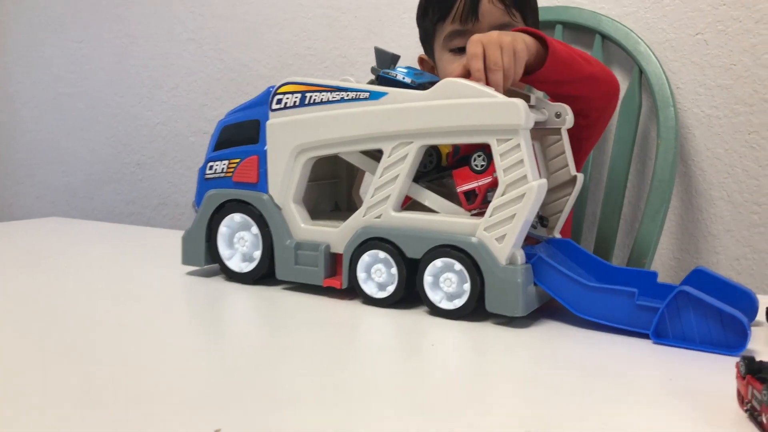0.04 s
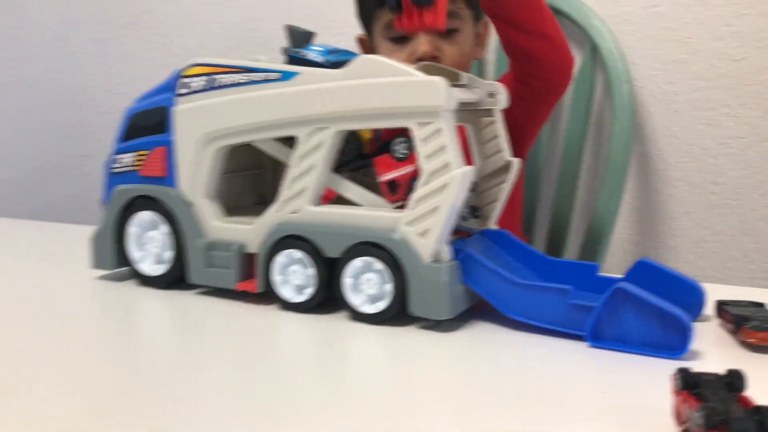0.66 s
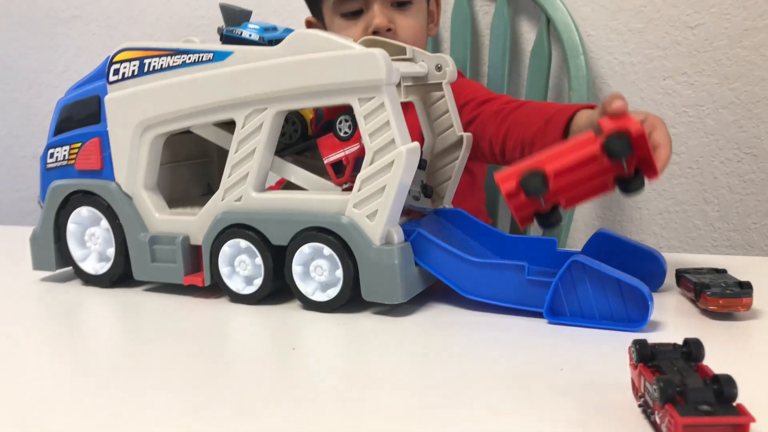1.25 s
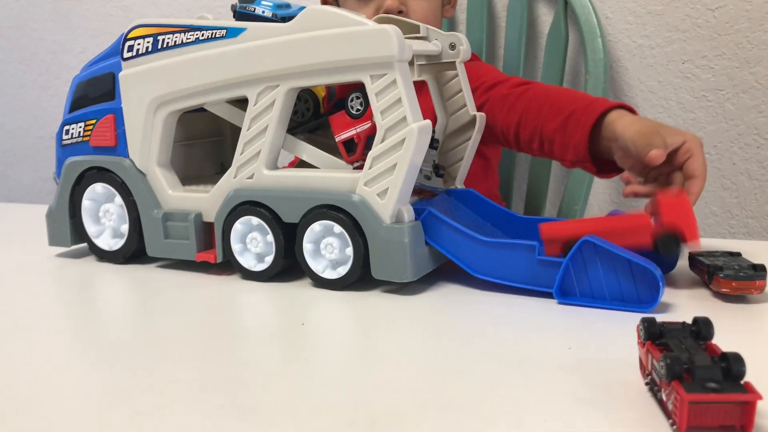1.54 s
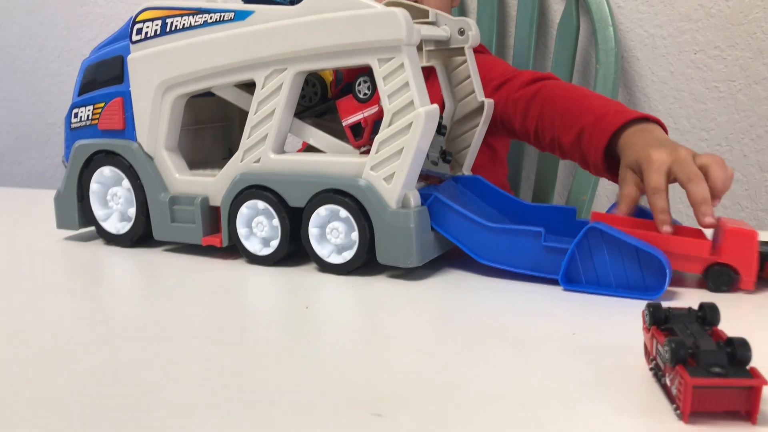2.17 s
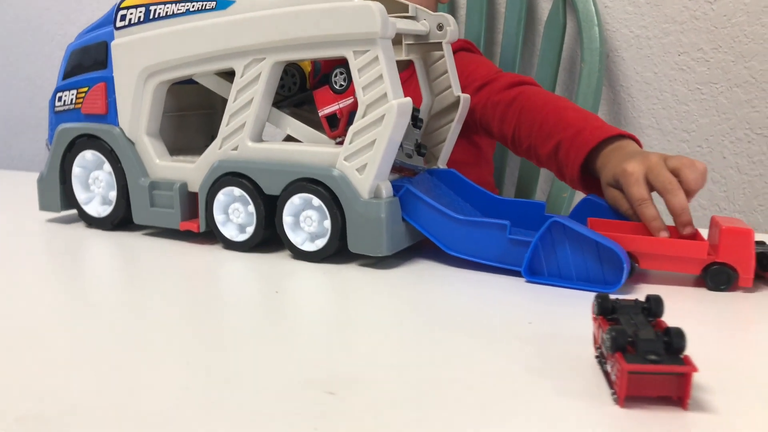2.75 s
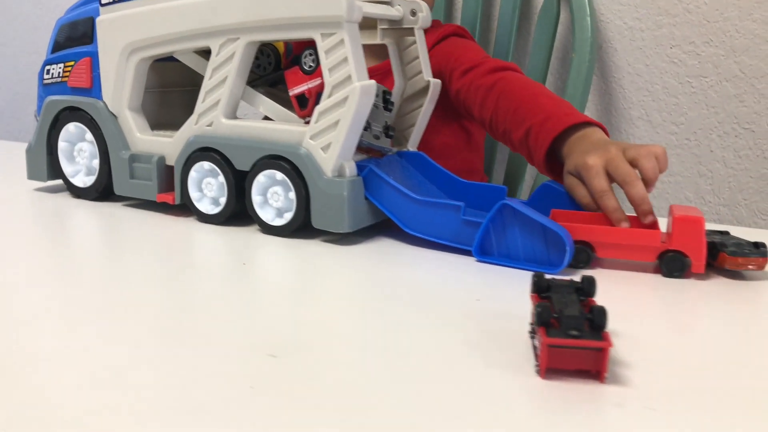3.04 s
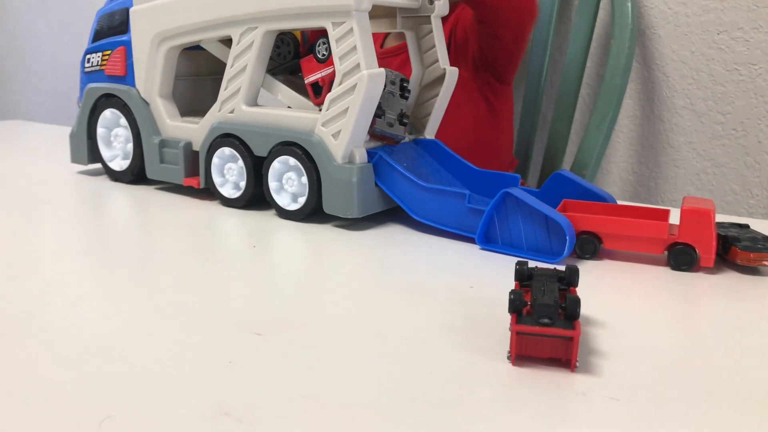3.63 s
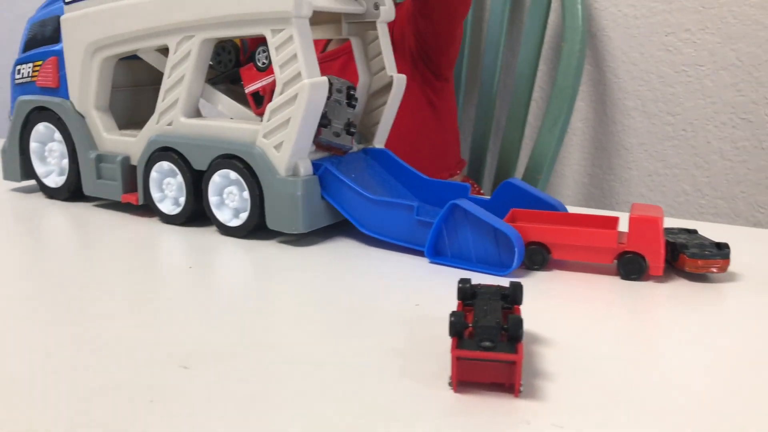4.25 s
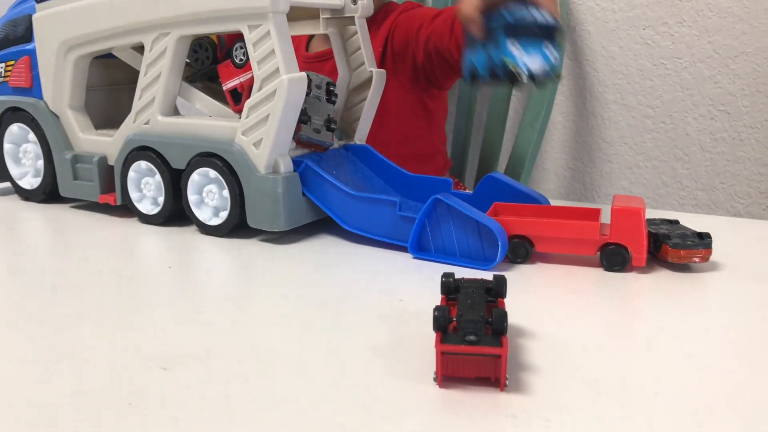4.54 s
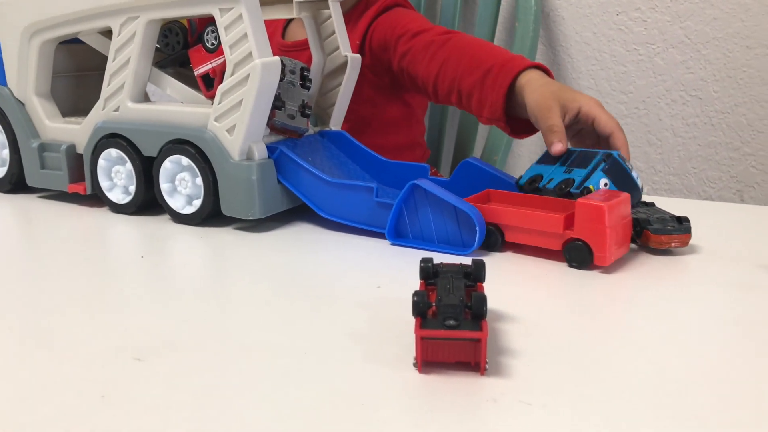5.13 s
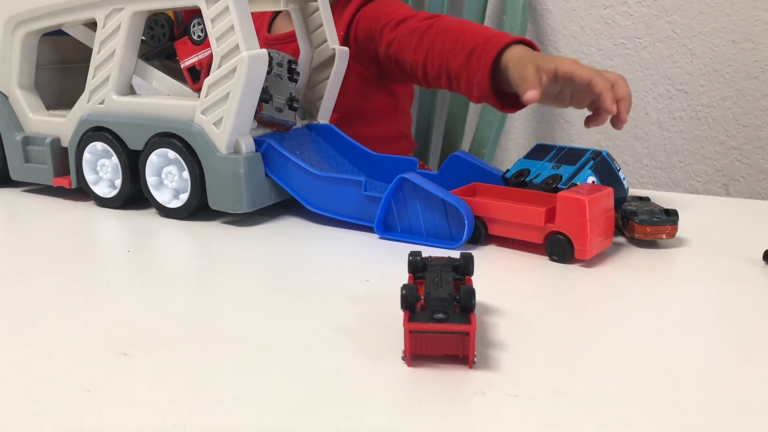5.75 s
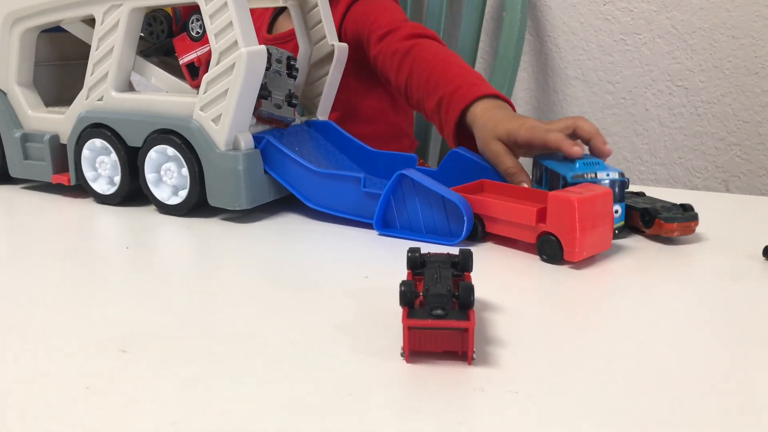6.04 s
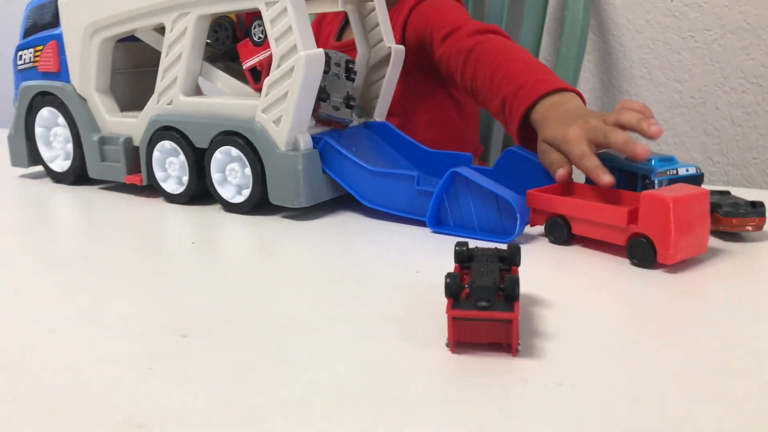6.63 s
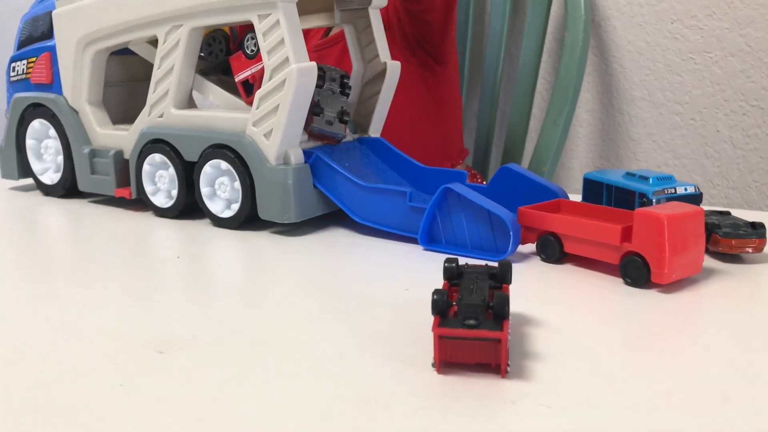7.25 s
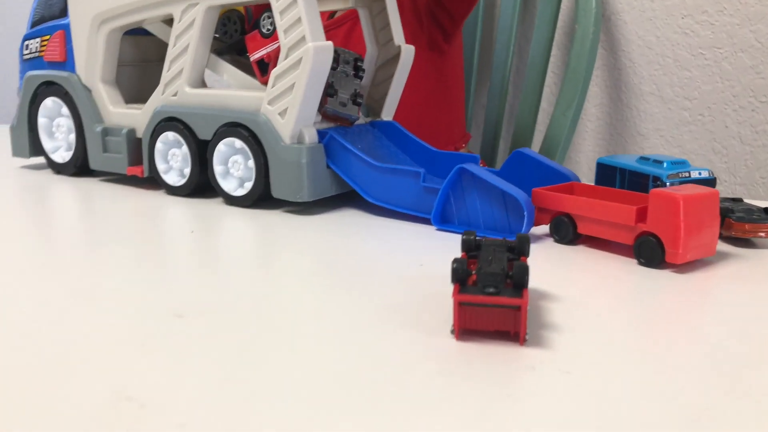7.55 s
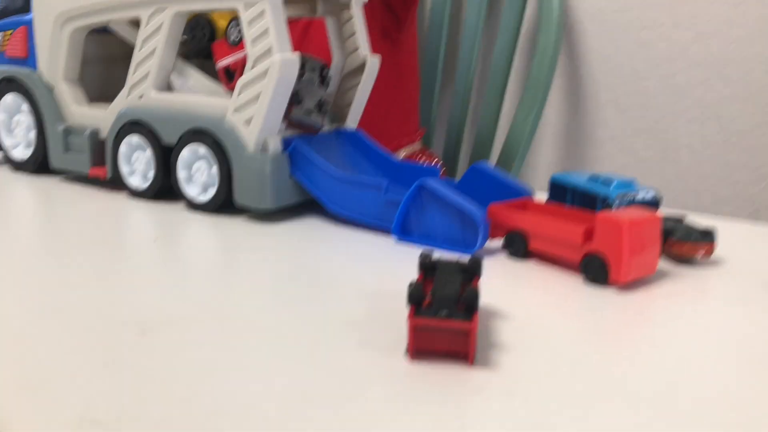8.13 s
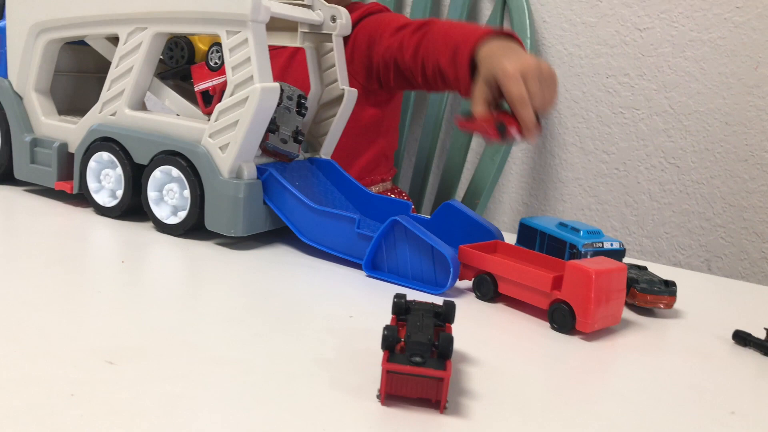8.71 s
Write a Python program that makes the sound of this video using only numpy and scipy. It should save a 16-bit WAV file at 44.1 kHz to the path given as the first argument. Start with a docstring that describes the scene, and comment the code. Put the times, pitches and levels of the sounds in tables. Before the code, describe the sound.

Toy cars rattle lightly inside a hollow plastic trailer. A plastic truck drops onto the ramp with a loud clatter, then rolls and clicks along the table. After a lull and another rattle in the trailer, a toy bus knocks down hard and is bumped about in several bursts, making the tabletop ring. Faint rattles finish it. The microphone is close in a small, quiet room, catching soft sleeve brushes.

```python
"""Plastic toy cars are pulled out of a hollow toy trailer, dropped on its ramp and pushed about on a table.
Each knock makes a toy's shell ring; loose wheels and axles rattle and click as the toys slide and roll.
A small part skitters, heavy blows shake the table, and a sleeve brushes softly in the small, quiet room.
The microphone is close, and the hardest knocks overload it."""
import sys
import numpy as np
from scipy import signal
from scipy.fft import rfft, irfft
from scipy.io import wavfile
from scipy.ndimage import uniform_filter1d

SR = 44100
rng = np.random.default_rng(int(sys.argv[2]) if len(sys.argv) > 2 else 0)


def inscribe(sig):
    """Save sig as 16-bit PCM at rate SR to the path in sys.argv[1].

    A 1-D sig is mono; a 2-D sig holds one channel per row.
    Samples are clipped to [-1, 1] before scaling.
    """
    pcm = np.round(np.clip(np.atleast_2d(sig).T, -1, 1) * 32767)
    wavfile.write(sys.argv[1], SR, pcm.astype(np.int16))


N = 391608
TOP_HZ = 15650  # upper limit of the treble


def amp(db):
    """Turns decibels into a gain to multiply by."""
    return 10 ** (np.asarray(db) / 20)


def unit(x):
    """Scales a sound to an average (rms) level of 1."""
    return x / np.sqrt(np.mean(x ** 2) + 1e-20)


def unit_peak(x):
    """Scales a sound so that its loudest 4 ms have an average (rms) level of 1."""
    return x / np.sqrt(uniform_filter1d(x ** 2, size=176).max() + 1e-20)


def read(points, hz):
    """Reads between the rows of a table, along a log-frequency axis."""
    pitches, values = np.transpose(points)
    return np.interp(np.log(hz + 1), np.log(pitches), values)


def add(mix, start_s, sound):
    """Mixes a sound in at its start time."""
    part = mix[max(round(start_s * SR), 0):][:len(sound)]
    part += sound[:len(part)]


def cut(x, hz, kind, order=2):
    """Keeps what lies below hz ("low") or above it ("high")."""
    return signal.sosfilt(signal.butter(order, hz, kind, fs=SR, output="sos"), x + 1e-18)


def resonate(x, hz, width_hz):
    """Rings at one pitch; the narrower the width, the longer the ring."""
    return signal.lfilter(*signal.iirpeak(hz, hz / width_hz, SR), x + 1e-18)


def ring_tones(force, tones):
    """An object rings with all its natural tones at once."""
    return sum(amp(db) * resonate(force, hz, width_hz) for hz, width_hz, db in tones)


def burst(t, fade_s):
    """Dying noise. Every fade time here is the time to fall by 60 dB."""
    return rng.standard_normal(len(t)) * 1000 ** (-t / fade_s)


def air():
    """The faint, steady hush of the room."""
    # tone colour of the hush: pitch_hz, level_db
    colour = [(30, -8.5), (90, -10), (200, -9), (400, -6.5), (700, -6), (1100, 1.5), (1800, -14.5),
              (4000, -21.5), (9000, -26), (15000, -42.5)]
    gain = amp(read(colour, np.fft.rfftfreq(N, 1 / SR)))
    return amp(-64.5) * unit(irfft(rfft(rng.standard_normal(N)) * gain, N))


def sleeve():
    """Cloth brushes softly as the arm reaches about, and the table it leans on rumbles faintly."""
    # reaches of the arm: middle_s, length_s, level_db
    reaches = [(0.25, 1.74, -54), (2.955, 2.9, -61), (7.052, 1.23, -58.5), (8.199, 1.6, -59.5)]
    motion, t = np.zeros(N), np.arange(N) / SR
    for middle_s, length_s, db in reaches:
        motion += amp(db) * np.cos(np.pi * np.clip((t - middle_s) / length_s, -.5, .5)) ** 2
    fibres = rng.standard_normal(N) * amp(1.9 * rng.standard_normal(N))
    brush = cut(cut(fibres, 216, "high"), 2200, "low", order=1)
    rumble = cut(cut(rng.standard_normal(N), 110, "low"), 40, "high")
    return motion * (unit(cut(brush, 9000, "low")) + amp(-19) * unit(rumble))


def shell(force, tones, crack_db):
    """A plastic shell cracks and rings; returns its middle clack, low thud and sharp, high edge."""
    sound = amp(crack_db) * force
    for k, (hz, width_hz, db) in enumerate(tones):
        # each point of contact favours other tones and, among the crowded high ones, other neighbours
        weight, shift = rng.standard_normal(2)
        detune = .035 * min(hz / 3000, 1) * shift
        sound += (-1) ** k * amp(db + 3 * weight) * resonate(force, hz * (1 + detune), width_hz)
    clack = cut(cut(sound, 910, "high", order=3), 4200, "low", order=4)
    floor_hz = .85 * tones[0][0]  # little sound comes out below the lowest tone
    thud = cut(cut(sound, floor_hz, "high", order=3), 1100, "low", order=4)
    edge = cut(cut(sound, 4600, "high", order=4), 14000, "low", order=1)
    return clack, thud, edge


def knocks(hits, tones, crack_db, spot_db, clack_db, thud_db, edge_db, chatter_s):
    """Each knock is a quick contact and a dying chatter of loose parts, coloured by the spot struck."""
    out, t = np.zeros(N), np.arange(SR // 7) / SR
    onset = 1 - np.exp(-t / .0016)
    for start_s, hit_clack_db, hit_thud_db, hit_edge_db, spot_hz in hits:
        fade_s = chatter_s * (1000 / spot_hz) ** .35  # small, stiff, high-pitched spots settle sooner
        chatter = rng.standard_normal(len(t)) * amp(3 * rng.standard_normal(len(t)))
        force = chatter * onset * 1000 ** (-t / fade_s)
        force += amp(spot_db) * resonate(force, spot_hz, .56 * spot_hz)
        clack, thud, edge = map(unit_peak, shell(force, tones, crack_db))
        add(out, start_s, amp(hit_clack_db + clack_db) * clack)
        add(out, start_s, amp(hit_thud_db + thud_db) * thud)
        add(out, start_s, amp(hit_edge_db + edge_db) * edge)
    return out


def catches(length, per_s, spread_db, parts=14):
    """Tiny impacts of uneven size land on many little parts, each with a short ring of its own."""
    out, chance = np.zeros(length), per_s / parts / SR
    for hz in np.geomspace(400, 12500, parts) * rng.uniform(.92, 1.08, parts):
        draw, taps = rng.uniform(-1, 1, length), np.zeros(length)
        hit = abs(draw) < chance
        rarity = np.minimum(np.log(chance / abs(draw[hit])), 3)  # the rarer a catch, the harder
        taps[hit] = np.sign(draw[hit]) * amp(spread_db * rarity)
        out += resonate(taps, hz, 90 + .018 * hz) + .03 * taps
    return unit(out)


def rattle(shoves, tones, crack_db, clack_db, thud_db, edge_db, per_s, spread_db, rub, grit_db):
    """Wheels and edges catch and rub, shaking the shell: louder with a push, fading as the toy coasts."""
    out, t = np.zeros(N), np.arange(SR // 2) / SR
    onset = np.minimum(t / .003, 1)
    for start_s, push_s, swell_db, level_db, fade_s, hollow_db, sharp_db in shoves:
        pushing = amp(-swell_db * np.maximum(1 - t / push_s, 0))
        coasting = 1000 ** (-np.maximum(t - push_s, 0) / fade_s)
        force = catches(len(t), per_s, spread_db) + rub * rng.standard_normal(len(t))
        clack, thud, edge = map(unit, shell(force, tones, crack_db))
        clumps = unit(uniform_filter1d(rng.standard_normal(len(t)), size=300))
        edge = unit(edge * amp(grit_db * clumps))  # the sharpest catches come in clumps
        edge *= coasting ** .29  # a slowing toy sounds duller
        sound = amp(clack_db) * clack + amp(hollow_db + thud_db) * thud + amp(sharp_db + edge_db) * edge
        add(out, start_s, amp(level_db) * onset * pushing * coasting * sound)
    return out


def toy_trailer():
    """Cars knock and rattle inside the hollow trailer and make its walls ring."""
    # natural tones of the trailer: pitch_hz, width_hz, level_db
    tones = [(453, 75, -65), (750, 75, 7.5), (1016, 128, -0.5), (1460, 214, 3), (1935, 230, -3.5),
             (2510, 184, 4), (3860, 670, -5.5), (4410, 660, 2.5)]
    # knocks of the cars inside: start_s, clack_db, thud_db, edge_db, spot_hz
    hits = [(0.021, -14, -26, -67, 1020), (0.0736, -20, -26, -64, 2540), (0.224, -18.5, -27.5, -64, 2640),
            (0.3145, -19, -28, -54, 2520), (0.335, -16.5, -26.5, -64, 2450), (0.4928, -10, -49, -51, 2570),
            (0.5034, -46, -15, -56, 920), (3.8327, -15.5, -32, -59, 1610), (3.99, -17, -35, -63, 4400),
            (4.1419, -9, -7.5, -40.5, 1260), (8.0854, -18.5, -34, -54, 1510), (8.1289, -14, -35, -61, 1310),
            (8.165, -8.5, -13.5, -38.5, 1020)]
    # shoves of the cars: start_s, push_s, swell_db, level_db, fade_s, hollow_db, sharp_db
    shoves = [(0.02, 0.078, 21, -29, 0.089, -6.5, -20), (0.23, 0.068, 17, -35, 1, -6.5, -21),
              (0.45, 0.04, 19, -28, 0.066, -4, -10), (3.785, 0.035, 9.5, -31.5, .12, -15, -8),
              (4.05, 0.076, 33, -18, 0.3, -1, -9), (6.927, 0.027, 25, -38.5, .22, -11, -7),
              (7.0, 0.048, 1, -58.5, 0.72, -9, 5), (7.228, 0.043, 6.5, -44.5, 0.12, 5, -0.5),
              (7.795, 0.029, 15, -37.5, 0.2, -4.5, -7.5), (7.965, 0.029, 18, -44.5, 0.094, 2, 5),
              (8.045, 0.14, 20, -22.5, 0.41, -9.5, -8.5), (8.44, 0.041, 14, -39, 0.11, -11, -7)]
    knocking = knocks(hits, tones, crack_db=-7.5, spot_db=8,
                      clack_db=-8, thud_db=-11.5, edge_db=15, chatter_s=.1)
    return knocking + rattle(shoves, tones, crack_db=-2.5, clack_db=-.5, thud_db=-1.5, edge_db=-3.5,
                             per_s=2500, spread_db=1.5, rub=1, grit_db=2.5)


def table_thump(toys):
    """The table gives a dull thump under the toys."""
    return amp(-.5) * cut(cut(toys, 107, "low", order=3), 40, "high")


def room(sound, delay_s=.0014, build_s=.0096, patterns=3):
    """Echoes build quickly and die soonest in the treble; their pattern shifts as toys and arm move."""
    # how long the room rings: pitch_hz, fade_s
    fades = [(150, .3), (400, 0.3), (1000, 0.35), (2800, 0.3), (5500, 0.29), (9000, 0.16), (15000, 0.047)]
    out, turn = np.zeros(N), 2 * np.pi * np.arange(N) / SR
    for k in range(patterns):
        echoes = rng.choice([-1., 1.], SR) * (rng.random(SR) < 4000 / SR)
        hz, t, spectrum = signal.stft(echoes, SR, nperseg=256)
        spectrum = spectrum * 1000 ** (-t / read(fades, hz)[:, None])
        tail = signal.istft(spectrum, SR, nperseg=256)[1]
        tail *= np.clip((np.arange(len(tail)) / SR - delay_s) / build_s, 0, 1)
        share = np.sqrt(2 / patterns) * np.cos(2 * turn + np.pi * k / patterns)
        out += signal.fftconvolve(sound * share, tail / np.linalg.norm(tail))[:N]
    return out


def clicks(width_hz=490):
    """Axles and loose parts give a dull tap and a short tock; the toy's hollow body answers faintly."""
    # light contacts: start_s, level_db, pitch_hz
    contacts = [(0.1942, -32.5, 1550), (0.2616, -28, 1590), (0.429, -24.5, 2280), (2.167, -28, 1674),
                (2.2973, -12, 2563), (2.4138, -21, 2630), (2.4679, -17, 2388), (2.6182, -12.5, 2440),
                (2.645, -22, 2450), (3.0011, -24.5, 2780), (3.0264, -33, 1783), (3.0414, -30.5, 2516),
                (3.279, -35.5, 2570), (3.618, -49.5, 10820), (3.636, -45, 4040), (3.976, -25.5, 1484),
                (4.0394, -28, 1430), (4.992, -15.5, 1588), (5.553, -24, 2014), (6.4757, -27.5, 1953),
                (6.6782, -16.5, 1455), (7.227, -35, 2010), (7.2656, -29, 2075), (7.416, -35.5, 3910),
                (7.6196, -35.5, 1940), (7.9993, -30.5, 1907)]
    # tones of a small loose part: pitch_ratio, level_db
    tones = [(1, 3.5), (1.35, -12), (2.1, -26), (3.4, -28)]
    out, t = np.zeros(N), np.arange(SR // 10) / SR
    for start_s, db, hz in contacts:
        force = burst(t, fade_s=.024)
        force[0] += 4  # the first contact stands out of the chatter
        tock = sum(amp(tone_db) * resonate(resonate(force, ratio * hz, width_hz), ratio * hz, width_hz)
                   for ratio, tone_db in tones if ratio * hz < TOP_HZ)
        body = resonate(resonate(force, 480, 260), 480, 260)
        tap = cut(cut(force, 700, "high"), 3500, "low", order=4)
        click = unit_peak(tock) + amp(-16.5) * unit_peak(body) + amp(-8.5) * unit_peak(tap)
        add(out, start_s, amp(db - 6) * click)
    return out


def ping():
    """A small hard part bounces twice and skitters to rest with a thin ring and a soft hiss."""
    # natural tones of the part: pitch_hz, width_hz, level_db
    tones = [(2550, 69, 9), (3300, 1200, -1), (4600, 740, -4), (5070, 500, -3)]
    # its landings: start_s, level_db, fade_s
    landings = [(0.924, -34.5, 0.019), (0.933, -33, 0.057), (0.947, -32.5, 0.21)]
    out, t = np.zeros(N), np.arange(SR // 2) / SR
    for start_s, db, fade_s in landings:
        ring = ring_tones(burst(t, fade_s), tones)
        ring = cut(cut(ring, 2550, "high", order=4), 5800, "low", order=10)
        add(out, start_s, amp(db) * unit_peak(ring))
    return out


def toy_truck():
    """The truck's shell rings as it drops on the ramp and rattles down it and along the table."""
    # natural tones of the truck: pitch_hz, width_hz, level_db
    tones = [(314, 16, -11), (389.5, 11, -2.5), (505, 25, -3.5), (530, 20, 1.5), (702, 62, -3),
             (764, 53, -1), (880, 14, -1), (1192, 87, 0.5), (1780, 180, -4), (2050, 38, -3.5),
             (2550, 260, -5), (3600, 30, -8), (4100, 35, -16), (5310, 150, -1), (6460, 200, -13),
             (7500, 350, -6), (8400, 69, -6.5), (10600, 170, -2)]
    # knocks on the ramp and table: start_s, clack_db, thud_db, edge_db, spot_hz
    hits = [(1.4607, -16, -17, -35, 1270), (1.474, -4.5, -15.5, -40, 1630), (1.5334, -2.5, -17, -23, 1540),
            (1.5636, -15, -16.5, -34, 1659), (1.5776, 0, -17.5, -23, 1110), (1.6369, 1, -29, 0, 1640),
            (1.6484, -3.5, -19, 2, 1849), (1.658, 12.5, -24, -10, 1102), (1.6843, 10.5, 1.5, -13, 1260),
            (1.6946, 8.5, -0.5, -3, 940), (1.7095, 7, -2.5, -7, 1060), (1.7383, 0, -7, -15, 536),
            (1.7548, 6, -6, -6, 1140), (1.7751, 2, -12, -13, 1210), (1.7907, -0.5, -27, -24, 1180),
            (1.9623, -23.5, -19.5, -33, 533), (2.0911, -21, -24.5, -43, 530),
            (2.2024, -19, -17.5, -23, 490), (2.2575, -18, -10, -32, 800), (2.2855, -37, -16, -20.5, 695),
            (2.3437, -17, -17.5, -31, 482), (2.6445, -25, -23.5, -35, 673), (2.6764, -37, -26.5, -28, 510)]
    # shoves of the truck: start_s, push_s, swell_db, level_db, fade_s, hollow_db, sharp_db
    shoves = [(1.444, .02, 5.7, -15.5, 0.57, -8.5, -26), (1.55, 0.041, 3.6, -13.5, 0.15, -6, -26),
              (1.618, 0.033, 36, 4, 0.23, -10, -4), (1.76, 0.063, 2, -14.5, 0.44, -9.5, -18.5),
              (1.96, 0.072, 7.4, -24, 0.6, -3.5, -32), (2.05, .24, 12, -20.5, 0.11, 1.5, -10),
              (2.346, 0.037, 2.8, -37.5, 0.49, 8.5, -14), (2.612, 0.055, 5.1, -36.5, 0.094, 7, 1),
              (3.0, .01, 2.7, -47.5, 0.69, 1.5, -25), (3.24, 0.042, 39, -46, 0.24, -1.5, -3)]
    knocking = knocks(hits, tones, crack_db=-6.5, spot_db=5,
                      clack_db=-5.5, thud_db=-.5, edge_db=-5, chatter_s=.045)
    return knocking + rattle(shoves, tones, crack_db=-8, clack_db=-3.5, thud_db=-3, edge_db=-4.5,
                             per_s=800, spread_db=4, rub=.33, grit_db=4)


def ramp(truck, until_s=1.8):
    """While the truck lies on the ramp, the thin ramp walls ring along with it."""
    touching = np.arange(N) < until_s * SR
    return amp(1) * resonate(truck * touching, hz=2600, width_hz=86)


def table_ring():
    """Heavy blows make the tabletop ring: a hollow, woody rumble over a deep thump."""
    # clusters of close tones of the tabletop: pitch_hz, width_hz, level_db
    top_tones = [(674, 60, -1), (805, 100, 4), (920, 280, 5.5), (1217, 220, 1), (1460, 80, -5.5)]
    # deep tones of the whole table: pitch_hz, width_hz, level_db
    deep_tones = [(68, 35, -2.5), (128, 28, 1), (186, 40, -0.5)]
    # heavy blows: start_s, ring_db, thump_db
    blows = [(1.686, -13.5, -16.5), (2.259, -25.5, -50), (4.785, -21, -32.5), (5.216, -6, -28),
             (5.249, -11, -31), (6.05, -22.5, -44.5), (6.125, -25.5, -40)]
    out, t = np.zeros(N), np.arange(SR // 2) / SR
    for start_s, ring_db, thump_db in blows:
        ring = ring_tones(burst(t, fade_s=.35), top_tones)
        ring = cut(cut(ring, 550, "high", order=3), 1900, "low", order=4)
        add(out, start_s, amp(ring_db) * unit_peak(ring))
        thump = ring_tones(burst(t, fade_s=.083), deep_tones)
        add(out, start_s, amp(thump_db) * unit_peak(cut(thump, 200, "low")))
    return out


def toy_bus():
    """The bus's shell rings as it bumps and rattles over the truck and the table."""
    # natural tones of the bus: pitch_hz, width_hz, level_db
    tones = [(225, 37, -5.5), (404, 13, 1.5), (480, 18, -1), (657, 40, 2.5), (768, 67, -4),
             (1210, 220, 0.5), (1590, 110, -9), (1820, 81, 2), (2605, 230, -3), (3170, 270, 2.5),
             (3860, 450, -8), (4300, 350, -2), (5170, 180, -6), (8080, 400, -1.5)]
    # knocks on the truck and table: start_s, clack_db, thud_db, edge_db, spot_hz
    hits = [(4.781, 10, -9.5, 1.5, 2553), (4.7874, 9, -4.5, -3.5, 2656), (4.8272, -1, -12, -17.5, 1870),
            (4.9028, -2.5, -11, -15.5, 2580), (5.1284, -8, -14, -24, 660), (5.2114, -1, -6, -15, 1330),
            (5.2167, 2.5, -12, -14, 760), (5.2364, -1, -5, -18.5, 754), (5.2494, -7.5, -13, -16, 503),
            (5.555, -31, -27.5, -58, 491), (5.9429, -6, -23.5, -25, 2050),
            (5.9523, -4.5, -21.5, -21.5, 460), (6.0008, -7, -15.5, -26.5, 2020), (6.0406, 1, -10, -15, 670),
            (6.0695, 3.5, -19, 4.5, 2870), (6.1065, 2.5, -12.5, -4, 2870), (6.12, 3.5, -16, -5, 2820),
            (6.1326, 0.5, -19.5, 2.5, 2850), (6.1499, -6, -17, -11, 2860), (6.5056, -7.5, -33, -38, 2650),
            (6.555, -7.5, -24, -11, 3020), (6.5703, -7, -13, -21, 1790), (6.588, -10, -13, -30, 476),
            (6.6474, -25, -22.5, -27, 506), (6.7097, -40, -40, -68, 496)]
    # shoves of the bus: start_s, push_s, swell_db, level_db, fade_s, hollow_db, sharp_db
    shoves = [(4.761, .026, 31.3, -2.5, 0.34, -4.5, -10.5), (4.9, 0.0084, 3, -23, 1, 0, -12.5),
              (5.085, 0.067, 19, -22.5, 0.19, 4.5, -16.5), (5.18, 0.051, 12, -10.5, .24, 2, -8),
              (5.918, 0.055, 14.3, -18, 0.48, 1, -11), (5.99, 0.027, 6.4, -13.5, 0.34, 1, -11.5),
              (6.05, 0.039, 2.4, -9, 0.12, -2.5, -12), (6.11, 0.018, 3, -17.5, 0.37, -6.5, -7),
              (6.48, 0.037, 20.4, -17, 0.36, -2, -14.5), (6.55, 0.025, 8.7, -14, 0.21, -5.5, -16.5),
              (6.62, 0.053, 1.9, -42, 0.099, 19.5, -5)]
    knocking = knocks(hits, tones, crack_db=-7.5, spot_db=8.5,
                      clack_db=-5, thud_db=-2, edge_db=0, chatter_s=.05)
    return knocking + rattle(shoves, tones, crack_db=-6, clack_db=1, thud_db=-2.5, edge_db=.5,
                             per_s=1500, spread_db=4, rub=.53, grit_db=2.5)


def scene():
    """Mixes the toys, the table, the sleeve and the room into one channel."""
    trailer, truck, bus = toy_trailer(), toy_truck(), toy_bus()
    truck += ramp(truck)
    small_parts = clicks() + ping()
    toys = trailer + truck + bus + small_parts
    table = table_thump(toys) + table_ring()
    to_room = amp(-12.5) * (trailer + bus) + amp(-10.5) * truck + amp(-14) * small_parts
    return (toys + table + room(to_room) + sleeve() + air())[None]


def record(dry):
    """The microphone colours the sound, overloads on the hardest knocks and loses the highest treble."""
    # tone colour of the microphone: pitch_hz, gain_db
    colour = [(40, 0.5), (120, 3), (250, 2), (500, 2.5), (1000, -1.5), (1600, -1), (2700, -4), (4000, -5.5),
              (6000, -5.5), (9000, -5.5), (12000, -11), (15500, -13)]
    hz = abs(np.fft.fftfreq(4096, 1 / SR))
    log_gain = np.log(amp(read(colour, hz)))
    response = np.fft.ifft(np.exp(np.conj(signal.hilbert(log_gain)))).real  # rings only after a knock
    coloured = signal.oaconvolve(dry, response[None, :len(response) // 2])[:, :N]
    clipped = np.clip(coloured, -1, 1)
    treble_cut = signal.firwin(511, TOP_HZ, window=("kaiser", 7), fs=SR)
    return signal.oaconvolve(clipped, treble_cut[None], "same")


dry = scene()
out = record(dry)
inscribe(out)
```